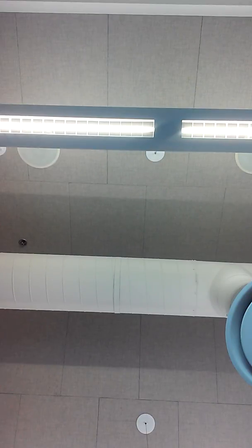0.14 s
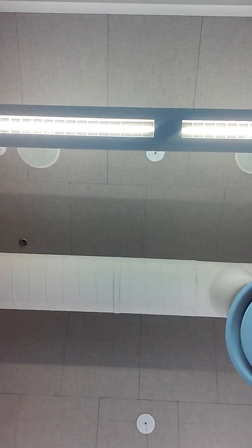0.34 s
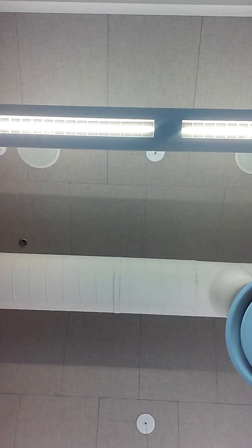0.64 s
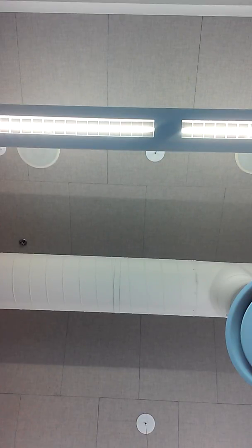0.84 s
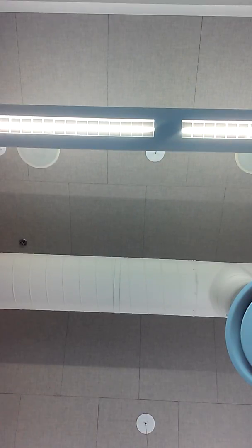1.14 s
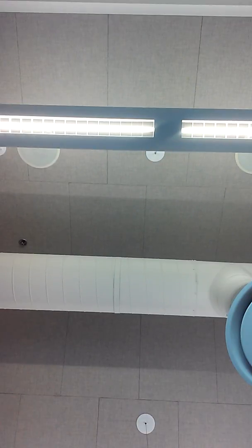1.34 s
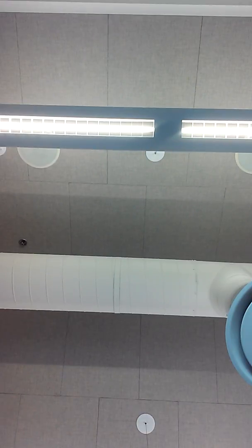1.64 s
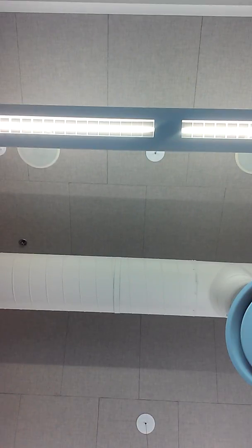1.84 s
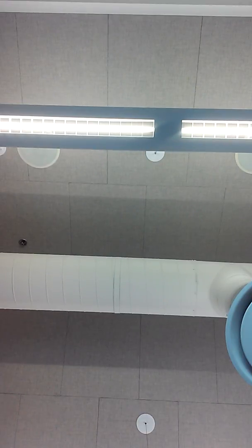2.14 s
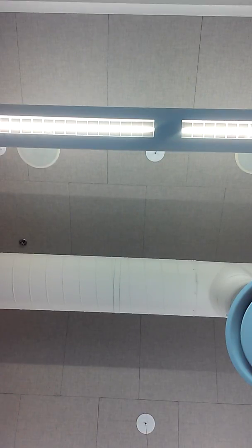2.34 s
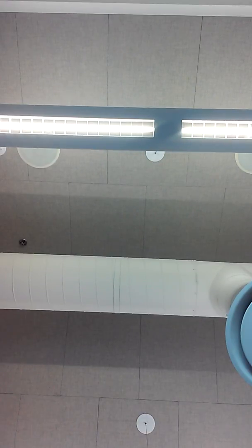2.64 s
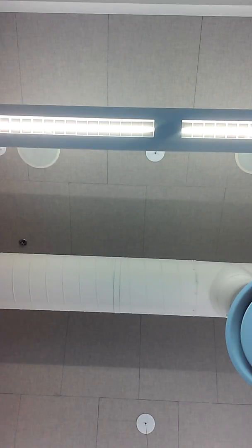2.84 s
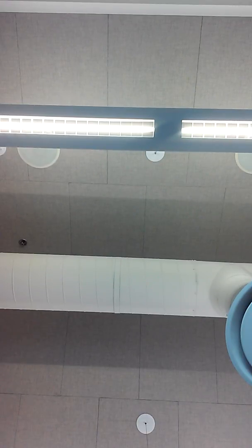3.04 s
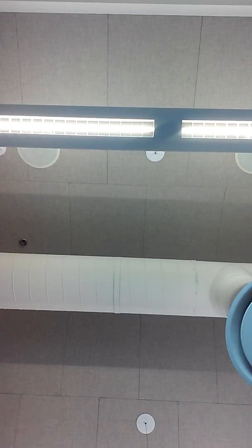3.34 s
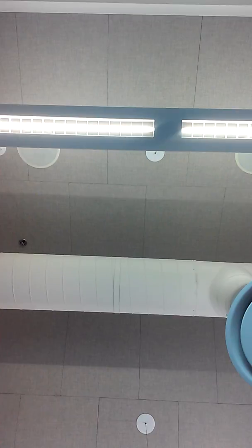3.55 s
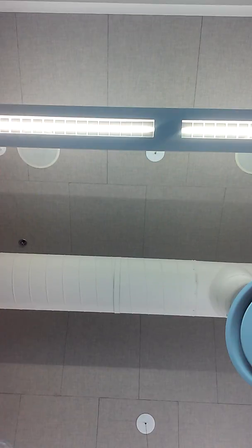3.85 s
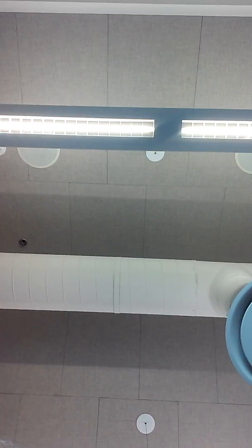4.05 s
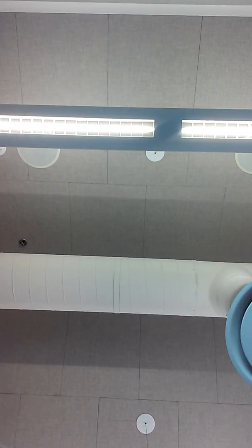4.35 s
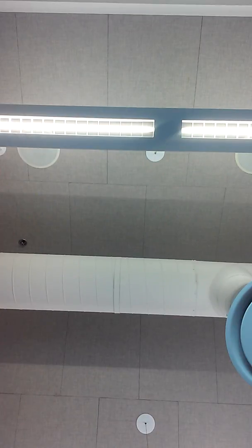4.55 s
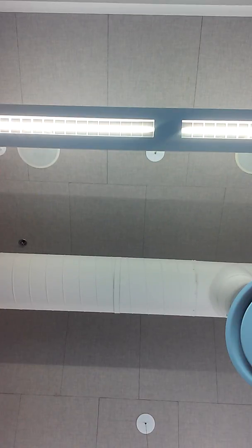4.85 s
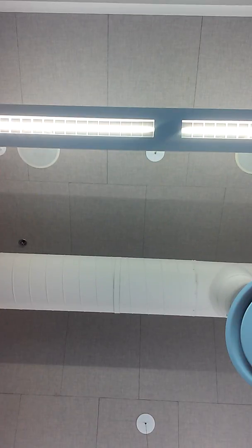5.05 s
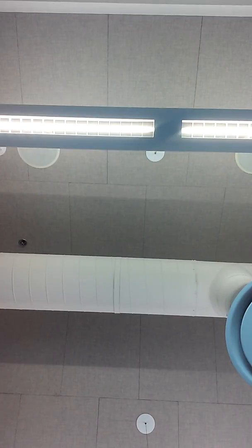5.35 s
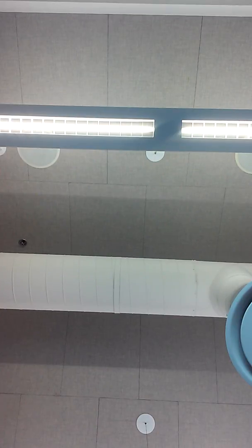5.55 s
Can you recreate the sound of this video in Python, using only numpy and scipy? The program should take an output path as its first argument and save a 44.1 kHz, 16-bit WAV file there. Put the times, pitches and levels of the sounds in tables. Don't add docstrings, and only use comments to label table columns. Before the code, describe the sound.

Single sheets of paper are leafed through by hand close to a phone on a table, hissing, buckling and snapping for about a second and a half, then thinning to faint rustles. After a hush, sheets land as a stack with a hard slap, rub and chatter, get knocked square and slide away with a dry scrape. Tiny slips follow, then near silence in a small quiet room.

```python
import sys
import numpy as np
from scipy import signal
from scipy.fft import rfft, irfft, next_fast_len
from scipy.io import wavfile
from scipy.ndimage import uniform_filter1d, map_coordinates

SR = 44100
rng = np.random.default_rng(int(sys.argv[2]) if len(sys.argv) > 2 else 0)


def makeup_ratio(level_db):
    decades = np.asarray(level_db, float) / 20
    return 10 ** decades


def int16_out(signal):
    q = np.round(np.clip(np.atleast_2d(signal).T, -1, 1) * 32767)
    wavfile.write(sys.argv[1], SR, q.astype(np.int16))


N = 251811

FORM_STARTS = [
    3.0,
    3.47,
    3.975,
    4.18,
    4.28,
    4.47,
]
STILL_DB = -90


def unit(x):
    return x / np.sqrt(np.mean(x ** 2) + 1e-20)


def peak(x):
    return x / np.abs(x).max()


def along(points, hz):
    f, v = np.transpose(points)
    return np.interp(np.log(hz + 1), np.log(f + 1), v)


def curves(rows):
    s, *cols = np.transpose(rows)
    return [np.interp(np.arange(N) / SR, s, c) for c in cols]


def held(tables):
    holds = []
    for move, after in zip(tables, tables[1:]):
        holds.append([[after[0][0] - .003, *move[-1][1:]]])
    rows = np.vstack(tables + holds)
    return curves(rows[np.argsort(rows[:, 0])])


def wobble(rate):
    knots = rng.standard_normal(int(N * rate / SR) + 4)
    return map_coordinates(knots, [np.arange(N) * rate / SR])


def filtered(x, response):
    m = 2 * next_fast_len(len(x) // 2 + 4096)
    return irfft(rfft(x, m) * response(np.fft.rfftfreq(m, 1 / SR)), m)[:len(x)]


def causal(x, gain):
    def response(hz):
        cepstrum = irfft(np.log(gain(hz) + 1e-6))
        half = len(cepstrum) // 2
        fold = np.r_[1, np.full(half - 1, 2), 1, np.zeros(half - 1)]
        return np.exp(rfft(cepstrum * fold))
    return filtered(x, response)


def lifted(x, modes):
    def lift(f):
        total = 1
        for c, w, db in modes:
            total = total + (makeup_ratio(db) - 1) * 1j * f * w / (c * c - f * f + 1j * f * w)
        return total
    return filtered(x, lift)


def patchy(x, depth_db):
    z = signal.stft(x, nperseg=256)[2]
    across_hz = uniform_filter1d(rng.standard_normal(z.shape), size=3, axis=0)
    field = uniform_filter1d(across_hz, size=14, axis=1)
    return signal.istft(z * makeup_ratio(depth_db * unit(field)), nperseg=256)[1][:N]


def air(flex_db):
    # f/Hz, level/dB
    ventilation = [(15, -35.5), (25, -7), (193, -4), (289, -11), (368, -8), (848, -1.5), (1240, -8),
                   (1380, -7), (2060, -13), (3340, -16), (15500, -24.5)]
    # t/s, f/Hz, level/dB
    squeak = [
        (5.5, 1248, -100),
        (5.55, 1230, -73.5),
        (5.71, 1256, -74),
    ]
    hum = unit(filtered(patchy(rng.standard_normal(N), .8), lambda hz: makeup_ratio(along(ventilation, hz))))
    open_db = uniform_filter1d(np.clip(0.41 * (flex_db + 76), 0, 16), size=1500)
    pitch_hz, level_db = curves(squeak)
    phase = 2 * np.pi * np.cumsum(pitch_hz + 36 * wobble(110)) / SR
    whistle = np.sin(phase) * makeup_ratio(level_db + 3 * wobble(45))
    return makeup_ratio(-74 + open_db + 0.79 * wobble(2.1)) * hum + whistle


def room(x):
    # f/Hz, t60/s
    decay = [(300, 0.33), (2000, 0.21), (10000, 0.18)]
    hz, t, z = signal.stft(rng.standard_normal(SR // 2), SR, nperseg=256)
    fade = makeup_ratio(-60 * t / along(decay, hz)[:, None])
    tail = signal.istft(z * fade, SR, nperseg=256)[1]
    delayed = np.pad(x, (300, 0))
    return signal.fftconvolve(delayed, tail / np.linalg.norm(tail))[:N]


def thuds():
    # t/s, peak level/dB, f/Hz, t60/s
    contacts = [(0.019, -54, 101, 0.3), (1.366, -44, 100.3, 0.2), (1.449, -49.5, 94.5, 0.49),
                (3.269, -57, 160, 0.075), (3.44, -36, 225, 0.088), (3.453, -33, 127, 0.17),
                (3.618, -28, 133, 0.03), (3.67, -40, 38, 0.24), (3.95, -41, 40, .2),
                (3.963, -40.5, 84, 0.17), (4.375, -35.5, 76.3, 0.083)]
    out, t = np.zeros(N + SR), np.arange(SR // 2) / SR
    for s, db, pitch_hz, t60 in contacts:
        envelope = (1 - np.exp(-t / 0.0042)) * makeup_ratio(db - 60 * t / t60)
        out[round(s * SR):][:len(t)] += np.sin(2 * np.pi * pitch_hz * t) * envelope
    return out[:N]


def slap():
    # t/s, peak level/dB, f/Hz, loss of deep ring/dB per octave below 800 Hz
    hits = [
        (3.5584, -.5, 1780, 0),
        (3.9823, -10, 2600, 9),
        (1.7736, -36, 7500, 9),
        (2.2653, -31.5, 2700, 9),
        (3.4445, -42, 9000, 9),
    ]
    # f/Hz, relative level/dB, t60/s
    ring_modes = [(400.2, -26, 0.21), (886, -17, 0.056), (1420, -22.5, 0.035), (5000, -25.5, 0.014)]
    out = np.zeros(N)
    for s, db, pitch_hz, light_db in hits:
        part = slice(round((s - .01) * SR), round((s + .3) * SR))
        t = np.arange(N)[part] / SR - s
        after = np.maximum(t, 0)
        dip = -np.cos(2 * np.pi * pitch_hz * t) * np.exp(-(t * pitch_hz / .66) ** 2)
        ring = 0
        for hz, level, t60 in ring_modes:
            ring_db = level + light_db * min(np.log2(hz / 800), 0) - 60 * after / t60
            ring = ring + makeup_ratio(ring_db) * np.sin(2 * np.pi * hz * after)
        out[part] += makeup_ratio(db) * (dip + ring * (1 - np.exp(-after / 0.00033)))
    return out


def chatter():
    # t/s, length/s, f/Hz, level/dB, relative octave level/dB
    catches = [(3.572, 0.025, 770, -30.5, -19.5), (3.59, 0.03, 870, -30, -22),
               (3.608, 0.053, 1732, -34, -23.5), (3.632, 0.038, 615, -24, -18),
               (3.632, 0.037, 860, -28, -15.5), (3.635, 0.048, 2100, -31.5, -41.5),
               (3.695, 0.037, 2374, -34, -39.5), (3.715, 0.041, 3380, -42.5, -31.5),
               (3.64, 0.03, 1323, -29.5, -19), (3.672, 0.026, 885, -29.5, -8),
               (3.688, 0.035, 1135, -24, -13), (3.69, 0.049, 1750, -26.5, -20.5),
               (3.708, 0.034, 573, -26.5, -10), (3.71, 0.028, 1301, -29, -16.5),
               (3.685, 0.026, 4700, -49, -36), (3.72, 0.025, 5050, -43.5, -34),
               (3.735, .02, 1187, -29.5, -14), (3.748, .035, 1340, -28.5, -19),
               (3.75, 0.053, 579, -33, -17), (3.785, 0.036, 1363, -27, -19),
               (3.79, 0.048, 2070, -29, -40.5), (3.8, .09, 428.4, -34.5, -19.5),
               (3.824, 0.035, 2610, -37.5, -28.5), (3.808, 0.021, 595, -26.5, -16),
               (3.812, 0.016, 1130, -21.5, -16), (3.831, .02, 1140, -17, -13.5),
               (3.83, 0.028, 1440, -28.5, -17.5), (3.852, .026, 1156, -24.5, -14.5),
               (3.85, 0.033, 1345, -28.5, -19), (3.884, 0.034, 1120, -33, -16),
               (3.895, 0.042, 4480, -46, -39), (3.921, 0.012, 516, -26, -21), (3.927, 0.012, 2227, -28, -4),
               (3.935, .011, 2225, -23.5, -6.5), (3.954, 0.0093, 4450, -34, -40),
               (3.94, 0.052, 518, -37.5, -18), (3.983, 0.018, 880, -25, -14.5),
               (1.042, 0.0059, 2500, -43.5, -12), (4.1, .03, 1300, -42, -20),
               (4.185, 0.052, 2400, -37.5, -20), (4.23, 0.054, 1810, -36, -21)]
    out = np.zeros(N)
    unsteady, size = wobble(350), makeup_ratio(1.9 * wobble(240))
    for s, length, pitch_hz, db, octave_db in catches:
        part = slice(round(s * SR), round((s + length) * SR))
        phase = 2 * np.pi * np.cumsum(pitch_hz * (1 + 0.023 * unsteady[part])) / SR
        tone = np.sin(phase) + makeup_ratio(octave_db) * np.sin(2 * phase)
        out[part] += makeup_ratio(db) * size[part] * tone * np.sqrt(np.hanning(len(phase)))
    return out


def pings():
    # t/s, peak level/dB, f/Hz, t60/s
    creases = [(0.049, -51, 1520, 0.0091), (.049, -50, 3280, .015), (0.049, -58, 4520, 0.026),
               (.4175, -32, 2000, 0.0069), (.541, -46, 6050, .03), (.588, -40, 4660, 0.017),
               (.667, -36.5, 880, 0.017), (.736, -32, 1070, 0.013), (.78, -52, 5130, .012),
               (.914, -34.5, 1360, .015), (.887, -45, 4180, .02), (1.0413, -35.5, 7000, 0.007),
               (1.051, -47.5, 5500, .01), (1.1047, -41, 4570, .008), (1.1047, -47, 6200, .006),
               (1.114, -43, 4750, .01), (1.172, -48, 3370, .02), (1.284, -53, 4010, .012),
               (1.336, -54, 3000, .01), (1.664, -51, 2700, .015), (1.774, -41, 6960, 0.0038),
               (1.043, -42, 1210, .015), (.612, -36, 1700, 0.011), (.621, -39, 1900, 0.01),
               (1.925, -62, 4230, .012), (1.925, -59, 5350, 0.0092), (2.115, -51, 1190, 0.018),
               (2.129, -56, 1040, .03), (2.266, -62, 4000, 0.03), (2.444, -53.5, 2780, .012),
               (2.458, -42, 2540, 0.0054), (2.461, -46.5, 2470, 0.0069), (2.388, -54, 2840, .01),
               (2.657, -61, 3200, .012), (2.657, -63, 2200, 0.011), (2.777, -66, 2730, .012),
               (3.435, -52, 7000, .01), (3.453, -40, 2990, .012), (3.479, -39.5, 4380, .025),
               (3.479, -29.5, 1950, .015), (3.951, -23, 2080, 0.0047), (3.972, -25, 3020, 0.0066),
               (3.974, -21, 4230, 0.013), (4.28, -24, 1760, 0.011), (4.716, -56, 610, 0.03),
               (4.6, -57, 3280, .015), (4.7, -59, 1800, .02), (4.704, -62, 3330, .025),
               (4.957, -68, 3100, .04), (4.737, -49.5, 1190, 0.013), (4.737, -58, 3300, .012),
               (4.738, -61, 4100, .01), (1.105, -39, 2680, .012)]
    out, t = np.zeros(N + SR), np.arange(SR // 16) / SR
    for s, db, pitch_hz, t60 in creases:
        rough = 1 + 0.55 * uniform_filter1d(rng.standard_normal(len(t)), size=9)
        envelope = (1 - np.exp(-t / 0.00041)) * makeup_ratio(-60 * t / t60)
        ring = np.sin(2 * np.pi * pitch_hz * t) * rough * envelope
        out[round(s * SR):][:len(t)] += makeup_ratio(db) * peak(ring)
    return out[:N]


def snaps():
    # t/s, peak level/dB, f/Hz, relative crack level/dB
    pops = [(.416, -22.5, 2020, -4.5), (.516, -36, 1260, 8), (.586, -26.5, 1360, 1.5),
            (.605, -23.5, 1330, 1), (.736, -24.5, 1090, -1.5), (.915, -30, 1350, -10),
            (1.042, -38.5, 2520, -1), (1.059, -34, 1280, 3), (1.105, -28.5, 2680, -2),
            (1.139, -38, 2210, 3), (1.182, -27, 3130, -12), (1.27, -34, 855, -14),
            (1.402, -20.5, 2220, -18), (1.417, -27, 2200, -1), (1.503, -23, 2950, -6),
            (1.515, -38, 3010, 7), (1.521, -18, 3000, -17), (1.768, -34.5, 780, -4), (2.115, -38, 840, -22),
            (2.129, -39, 825, -23), (2.266, -29.5, 2470, -4), (3.443, -35, 972, -8.5),
            (3.698, -25, 1090, -18), (3.722, -20, 1170, -3), (3.981, -8.5, 880, 1), (4.736, -42.5, 598, -8)]
    # t/s, peak level/dB, f/Hz, relative crack level/dB
    rattles = [(.047, -34.5, 3270, -4.5), (.257, -28, 2750, -20), (.289, -21, 1280, -10),
               (.377, -32.5, 1710, 1), (0.436, -27, 1190, -4), (.617, -23.5, 1370, -4), (.667, -28, 896, 3),
               (.773, -22.5, 1410, -34), (.827, -26.5, 1440, -2), (1.164, -28.5, 2850, 0),
               (1.336, -38, 896, -1), (1.368, -29, 1150, -9), (1.489, -30.5, 1050, -16),
               (2.243, -44, 1050, 0), (2.655, -46.5, 1080, -14), (3.268, -35.5, 881, 3),
               (3.436, -45.5, 1670, 6), (3.452, -32, 756, -0.9), (3.479, -17.5, 651, -9.5),
               (3.506, -18, 877, -18), (3.95, -19, 518, -9.5), (3.9705, -7, 1670, -5),
               (4.183, -20, 2420, -22), (4.593, -43.5, 597, -18), (4.701, -38.5, 603, -9)]
    # t/s, peak level/dB
    flicks = [(.274, -33), (0.441, -42), (0.585, -34), (.83, -44), (.915, -41), (1.041, -41), (1.489, -43),
              (1.924, -62), (2.387, -66), (3.268, -46), (3.44, -52.5), (3.449, -49), (3.5575, -43),
              (3.9698, -24), (3.982, -26.5)]
    # f/Hz, level/dB per Hz
    tick_colour = [(2500, -28.5), (4000, 0), (7000, 9), (10000, -6.5), (15500, -25)]
    # f/Hz, level/dB per Hz
    crack_colour = [(400, -32.5), (900, -3), (2000, 3), (4000, -4.5), (6000, -33)]
    pop_t60, rattle_t60, tick_db = .027, 0.11, -45
    out, t = np.zeros(N + SR), np.arange(SR // 8) / SR
    rise = 1 - np.exp(-t / 0.00078)
    fizz = filtered(rng.standard_normal((2, N)).ravel(), lambda hz: makeup_ratio(along(tick_colour, hz)))
    fizz = fizz.reshape(2, N)

    def tick(s, kind):
        return peak(rise * makeup_ratio(-60 * t / 0.016) * fizz[kind, round(s * SR):][:len(t)])

    buckles = [(*row, pop_t60) for row in pops] + [(*row, rattle_t60) for row in rattles]
    for s, db, pitch_hz, crack_db, t60 in buckles:
        noise = rng.standard_normal((2, len(t)))
        jerks = noise[1] * (rng.random(len(t)) < 2200 / SR) * makeup_ratio(-60 * t / 0.02)
        jerks[20] = -1.0
        stretch = (1800 / pitch_hz) ** 0.14
        crack = peak(causal(jerks, lambda hz: makeup_ratio(along(crack_colour, hz * stretch))))
        page = filtered(noise[0], lambda hz: np.exp(-(np.log2((hz + 1) / pitch_hz) / 0.41) ** 2))
        rattle = peak(rise * makeup_ratio(-60 * t / t60) * page)
        snap = makeup_ratio(-7) * rattle + makeup_ratio(crack_db) * crack + makeup_ratio(tick_db + 6.5) * tick(s, kind=0)
        out[round(s * SR):][:len(t)] += makeup_ratio(db) * snap
    for s, db in flicks:
        out[round(s * SR):][:len(t)] += makeup_ratio(db + 3.0) * tick(s, kind=1)
    return out[:N]


def leafing(lead, trail, gain_db):
    # t/s, rise/s per 20 dB, fall/s per 20 dB, pressure level/dB, speed level/dB
    turns = [(.0, .1, 0.18, -56, -15), (.06, 0.4, 0.1, -58, -14), (0.305, 0.0533, 0.18, -39, -12.5),
             (0.449, 0.03, 0.12, -41.5, -16.5), (0.627, 0.0557, 0.1, -40.5, -17.5),
             (.738, .003, 0.09, -50, -14), (.776, 0.02, 0.21, -49, -18), (.69, 0.01, 0.13, -52, -19),
             (.916, 0.02, 0.09, -44.5, -14), (.89, 0.1, 0.1, -52.5, -5), (1.044, 0.002, 0.1, -57, -8),
             (1.059, .002, .03, -52, -19), (1.106, 0.003, 0.18, -53.5, -9), (.545, 0.05, 0.3, -56, 1),
             (1.166, .002, 0.15, -49.5, -10.5), (1.26, .01, 0.51, -61, -8.5), (1.372, .004, 0.35, -51, -34),
             (1.404, .002, .09, -45, -12), (1.529, 0.06, 0.12, -44.5, -8), (1.775, .2, 0.15, -59, -28),
             (1.579, 0.09, 0.11, -50, -6.5), (2.116, .002, 0.3, -61, -40), (2.0, .3, .2, -84, 3),
             (2.28, .035, 0.0853, -54, -23), (2.33, 0.01, 0.27, -63, -23), (2.4, 0.07, 0.14, -64.5, 0.5),
             (2.444, 0.09, 0.12, -64.5, 0), (2.657, .003, 0.06, -66, -17)]
    t, power = np.arange(0, N, 32) / SR, makeup_ratio(2 * STILL_DB)
    for s, rise, fall, db, speed_db in turns:
        away = np.where(t < s, (s - t) / (lead * abs(rise)), (t - s) / (trail * abs(fall)))
        power = power + makeup_ratio(2 * (db + gain_db(speed_db) - 20 * away))
    return np.interp(np.arange(N) / SR, t, 10 * np.log10(power))


def controls():
    # t/s, pressure level/dB, edge contact level/dB, speed level/dB
    laying = [
        [(3.272, -48.5, -7.5, -11.5), (3.334, -44.5, -16, -24), (3.348, -53.5, -9, -16.5),
         (3.402, -60, -19, -16.5), (3.43, -63.5, -18, -14)],
        [(3.445, -49.5, 1.5, -5), (3.473, -49.5, -6, -10), (3.477, -42.5, -6, -13.5),
         (3.517, -36.5, -15, -22.5), (3.546, -41.5, -11.5, -21.5)],
    ]
    rubbing = [
        [(3.562, -20, -10, -37), (3.574, -28, -16.5, -32), (3.62, -30, -11.5, -30),
         (3.676, -26.5, -16.5, -32.5), (3.712, -27, -8, -33.5), (3.742, -27, -10.5, -30)],
        [(3.752, -30, -17, -45), (3.813, -28, -17, -52.5), (3.835, -24, -17, -34), (3.875, -31, -16, -40.5),
         (3.918, -37, -9.5, -22.5)],
    ]
    squaring = [
        (3.926, -30, -7, -19.5),
        (3.939, -29, 1.5, -18),
        (3.962, -36, 2, -25),
    ]
    drawing = [
        [(3.988, -37.5, 2.5, -8.5), (4.008, -39.5, -3, -15.5), (4.096, -35, -6.5, -17.5),
         (4.116, -33, -10, -18), (4.145, -38, -8, -21), (4.175, -35.5, -9, -20)],
        [(4.182, -34, -5.5, -15.5), (4.25, -33, -3, -16), (4.324, -36, -1.5, -18), (4.385, -41.5, -7, -15.5),
         (4.41, -41, -11.5, -22), (4.445, -49, -11, -16), (4.47, -52.5, -21, -24), (4.52, -63.5, -11, -14)],
    ]
    settling = [
        (4.6, -69, 0, -2),
        (4.693, -71.5, -11, -9),
        (4.715, -64.5, -12, -24),
        (4.786, -67.5, -16, -21),
        (4.85, -88, 2, -1),
        (4.97, -86, 9, 4),
        (5.12, -86, -1, -3),
    ]
    brushing = [
        (5.35, -92, -4, -4),
        (5.42, -86, -7, 5.5),
        (5.5, -86.5, -1.5, 6.5),
        (5.62, -88.5, 3, -2.5),
    ]
    # t/s, level/dB
    leaning = [
        [(0, -56.5), (.2, -68.5), (.32, -61.5), (1.33, -67.5), (1.38, -57.5), (1.8, -65.5), (1.92, -84),
         (2.41, -68.5), (2.7, -84)],
        [(3.266, -59), (3.426, -66), (3.442, -50.5), (3.95, -51.5), (4.32, -57.5), (4.396, -51), (4.45, -59.5),
         (4.8, -73.5), (4.88, -85)],
    ]

    still = [(0, STILL_DB, 0, 0)]
    press_db, edge_db, speed_db = held([still, *laying, *rubbing, squaring, *drawing, settling, brushing])
    turn_flex_db = leafing(1.0, 0.99, lambda speed_db: 0)
    turn_scrape_db = leafing(1.49, 0.74, lambda speed_db: 1.5 + 0.43 * speed_db)
    turn_hiss_db = leafing(2.15, 0.89, lambda speed_db: -0.55 + speed_db)
    loose = np.arange(N) / SR < FORM_STARTS[0]
    flex_db = np.where(loose, turn_flex_db, press_db)
    scrape_db = np.where(loose, turn_scrape_db - turn_flex_db, edge_db)
    hiss_db = np.where(loose, turn_hiss_db - turn_flex_db, speed_db)
    return flex_db, scrape_db, hiss_db, held(leaning)[0] - 2.5 - flex_db


def slips(rate, spread_db, clump_db, depth_db):
    draw = rng.random((N, 2))
    size = makeup_ratio(spread_db * np.minimum(-np.log(1 - draw[:, 1]), 3))
    kicks = (draw[:, 0] < rate / SR) * size * rng.standard_normal(N)
    return patchy(kicks * makeup_ratio(clump_db * wobble(45)), depth_db)


def paper_part(x, lo_hz, hi_hz):
    # f/Hz, level/dB per Hz
    loose = [(180, -46), (300, -15), (610, -13.5), (720, 0.5), (1220, -1.5), (1330, -4), (1460, -2.5),
             (1750, 0), (2790, -6.5), (3130, -9), (5850, -18), (6900, -17), (15500, -57)]
    # f/Hz, level/dB per Hz
    stack = [(150, -63), (250, -36.5), (378, -20.5), (427, -8.5), (624, -7), (809, -3.5), (1120, -2),
             (1250, -10.5), (1330, -4), (2060, -6.5), (4240, -34), (4960, -31), (15500, -81.5)]
    # f/Hz, level/dB per Hz
    drag = [(180, -49), (300, -31), (708, -14.5), (1120, -6.5), (1420, -14), (1750, -7), (2170, -5),
            (2440, -4.5), (3400, -4), (3870, -11.5), (4880, -10), (6360, -14.5), (8700, -23),
            (15500, -52.5)]
    # f/Hz, width/Hz, level/dB over the flat path
    bound = [(410, 50, 3.5), (630, 45, 5.5), (870, 16, 3.5), (1140, 33, 4.5), (1340, 45, 3),
             (1763, 50, 5.5), (2070, 90, 4.5), (2350, 100, 3), (2950, 300, 3), (5200, 900, 3),
             (8000, 2200, 7)]
    # f/Hz, width/Hz, level/dB over the flat path
    low_gap = [(855, 40, 5), (1300, 60, 4.4), (1670, 170, 12), (2130, 280, 5), (2940, 100, 5.4),
               (4450, 200, 4.4), (6900, 300, 4)]
    # f/Hz, width/Hz, level/dB over the flat path
    gap = [(1130, 45, 2.5), (1810, 210, 7.8), (2400, 140, 7.4), (2750, 80, 8.4), (3250, 150, 6.1),
           (4980, 360, 6), (8270, 450, 7.9)]
    short_gap = [(c * 1.048, w, db) for c, w, db in gap]
    even_loose, even_stack, even_drag = 0.63, 2.2, 0.82

    def band(hz):
        return 1 / np.sqrt((1 + (lo_hz / (hz + 1)) ** 12) * (1 + (hz / hi_hz) ** 12))

    rest = (stack if lo_hz < 1000 else loose, [], even_loose)
    forms = [(loose, [], even_loose), rest, (stack, bound, even_stack), (drag, low_gap, even_drag),
             (drag, gap, even_drag), (drag, short_gap, even_drag), rest]
    cuts = np.round(np.array(FORM_STARTS) * SR).astype(int)
    slipping, rubbing = np.split(unit(x), cuts), np.split(rng.standard_normal(N), cuts)
    pieces = []
    for slip, rub, (colour, modes, even) in zip(slipping, rubbing, forms):
        shaken = lifted(slip + even * rub, modes)
        pieces.append(unit(causal(shaken, lambda hz: band(hz) * makeup_ratio(along(colour, hz)))))
    return np.concatenate(pieces)


def softened(flex, flex_db, scrape_db):
    light = np.clip((-8.0 - scrape_db) / 8, 0, 1) * np.clip((-40.5 - flex_db) / 6, 0, 1)
    slow = filtered(flex, lambda hz: 1 / np.sqrt(1 + (hz / 1500) ** 8))
    return flex + light * (slow - flex)


def strokes(flex_db, scrape_db, hiss_db, rumble_db):
    # f/Hz, level/dB
    shaken_table = [(12, -33), (20, -7), (27, -6), (43, 0), (87, 0.5), (282, -8), (400, -8), (520, -34.5),
                    (880, -120)]
    flex = paper_part(slips(rate=2500, spread_db=2.5, clump_db=1.3, depth_db=2.5), 100, 2500)
    scrape = paper_part(slips(rate=7000, spread_db=2, clump_db=1.1, depth_db=2.2), 2500, 6000)
    hiss = paper_part(slips(rate=17000, spread_db=5.0, clump_db=0.9, depth_db=3.0), 6500, 18000)
    shakes = slips(rate=3000, spread_db=1.5, clump_db=1.2, depth_db=1.5)
    rumble = unit(filtered(shakes, lambda hz: makeup_ratio(along(shaken_table, hz))))
    slide = softened(flex, flex_db, scrape_db) + makeup_ratio(scrape_db) * scrape + makeup_ratio(hiss_db) * hiss
    return makeup_ratio(flex_db) * slide, makeup_ratio(flex_db + rumble_db) * rumble


def scene():
    # f/Hz, width/Hz, level/dB over the flat path
    table_top = [(610, 30, 6.5), (868, 19, 3), (1140, 80, 2), (1370, 71, 4.5), (1764, 36, -1),
                 (2080, 140, 1.5), (4380, 1200, 4.5), (7300, 700, 1.5), (8610, 400, 1.5)]
    moves = controls()
    slide, rumble = strokes(*moves)
    through_table = lifted(makeup_ratio(-2.0) * slide + makeup_ratio(-6.0) * snaps(), table_top)
    paper = through_table + slap() + chatter() + pings()
    return (paper + makeup_ratio(-13) * room(paper) + rumble + thuds() + air(moves[0]))[None]


def top_cut(x):
    return signal.sosfilt(signal.butter(12, 15700, fs=SR, output="sos"), x)


def record(dry):
    limited = filtered(dry[0], lambda hz: hz < 15680)
    return top_cut(limited[None] - .0004)


dry = scene()
out = record(dry)
int16_out(out)
```